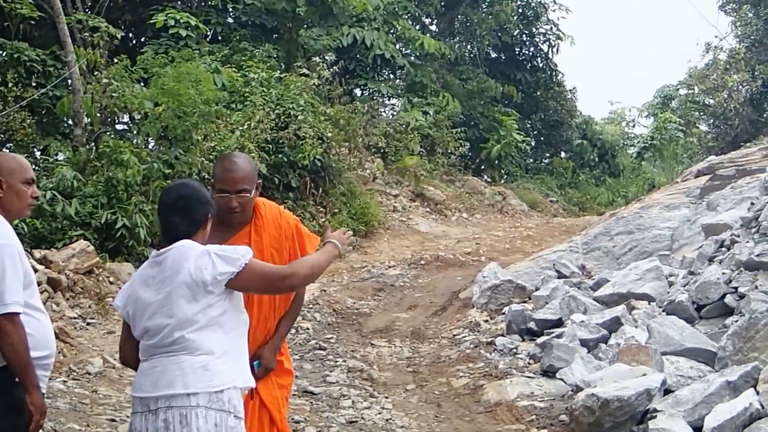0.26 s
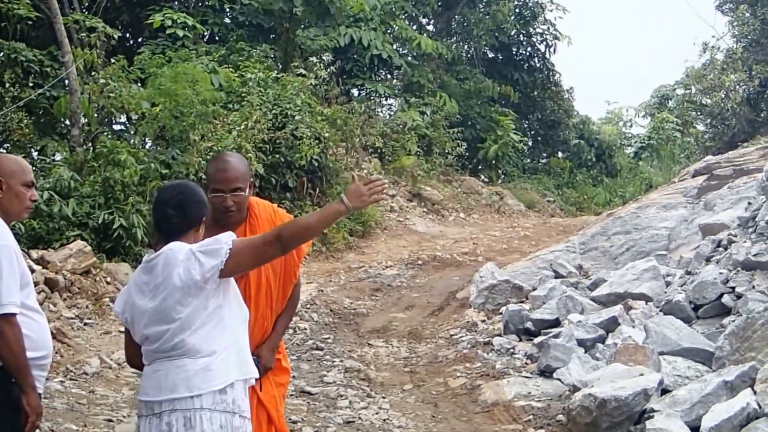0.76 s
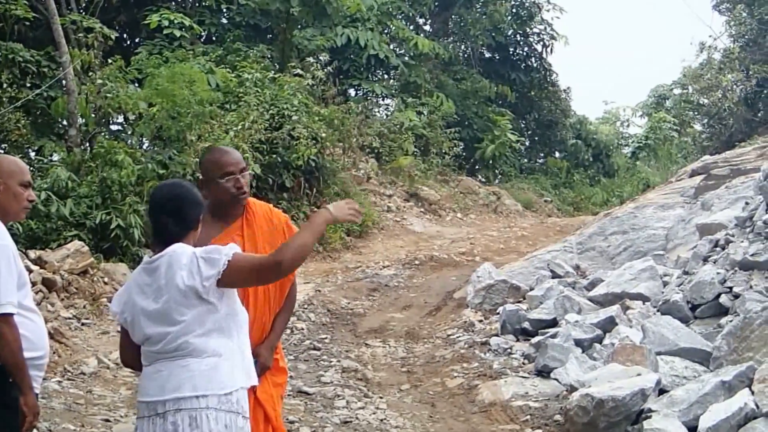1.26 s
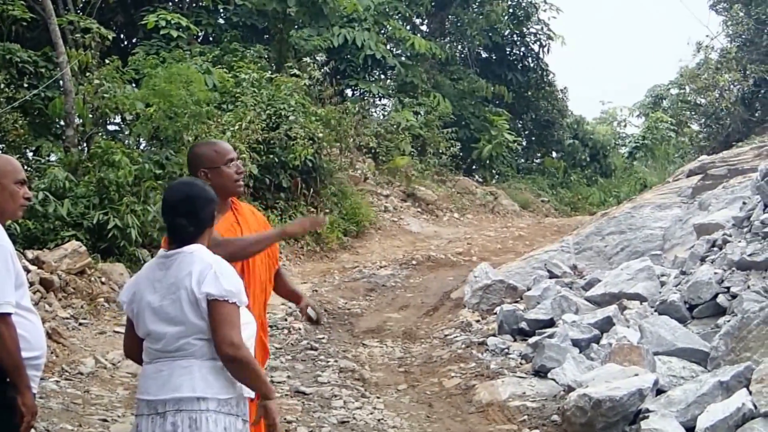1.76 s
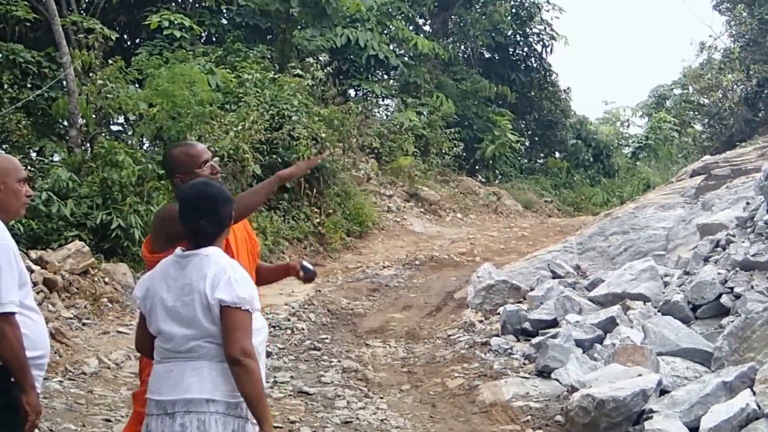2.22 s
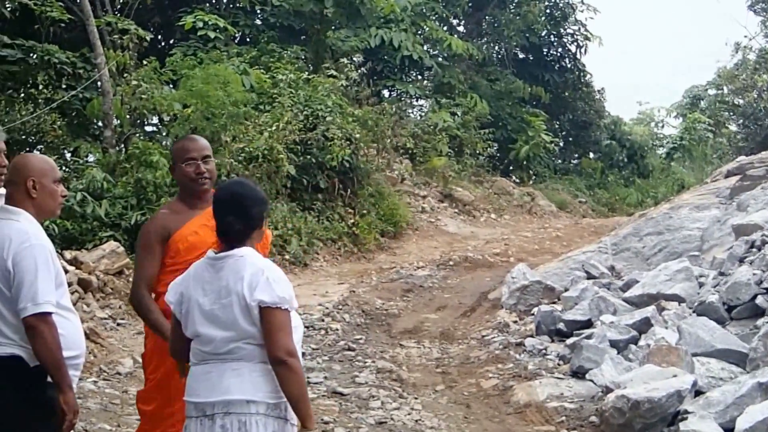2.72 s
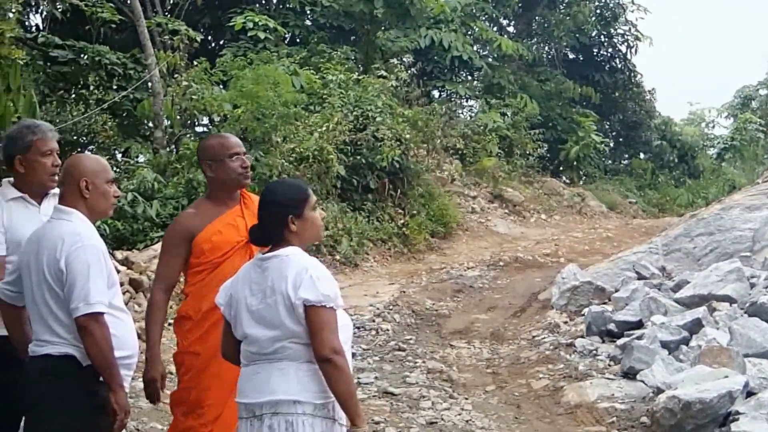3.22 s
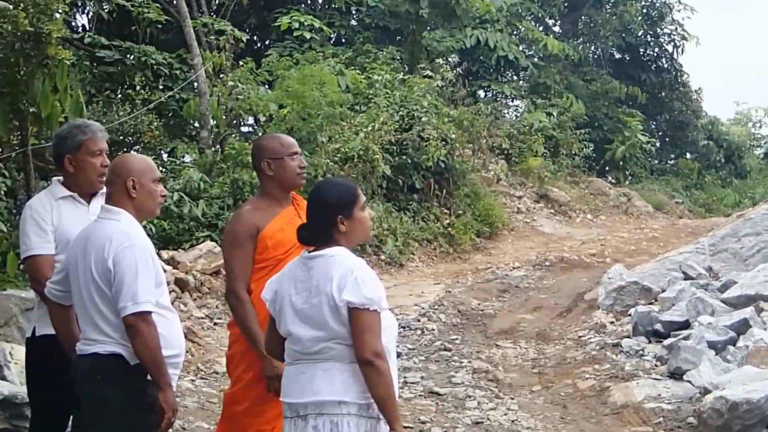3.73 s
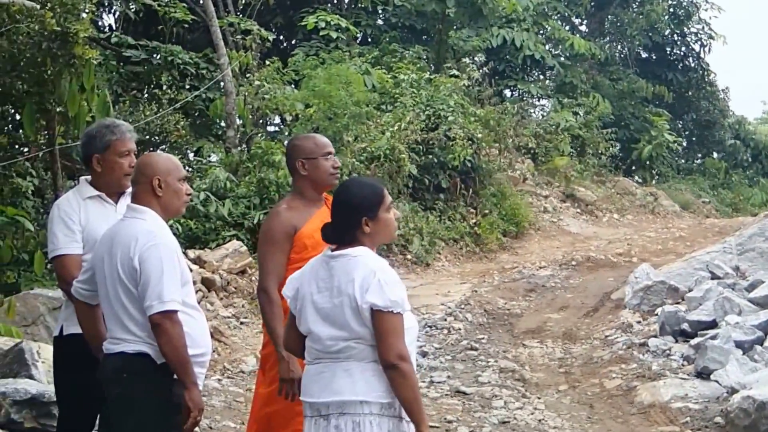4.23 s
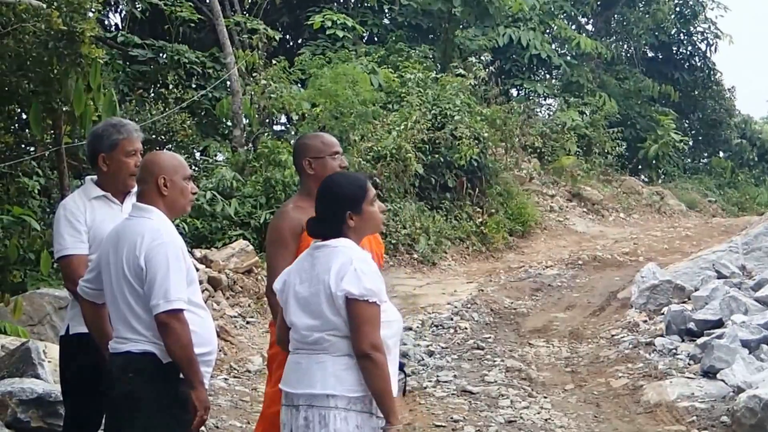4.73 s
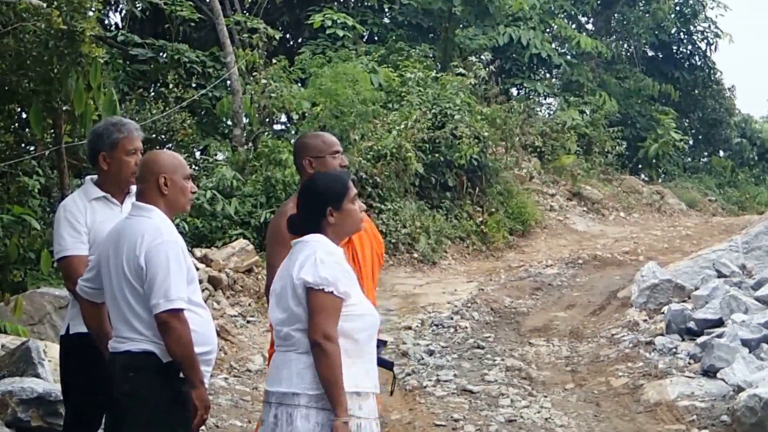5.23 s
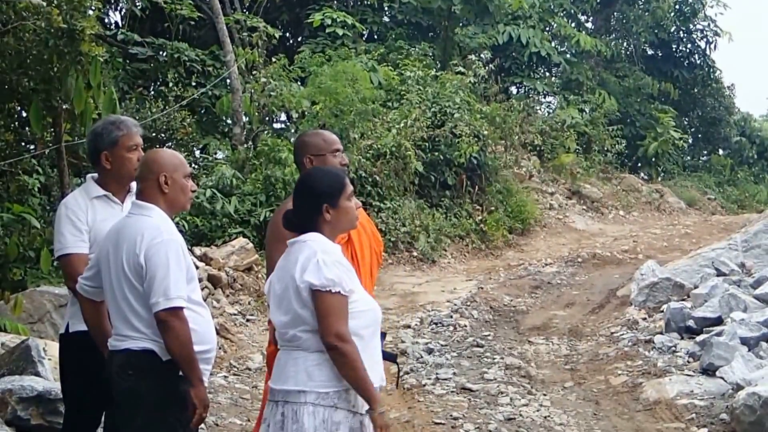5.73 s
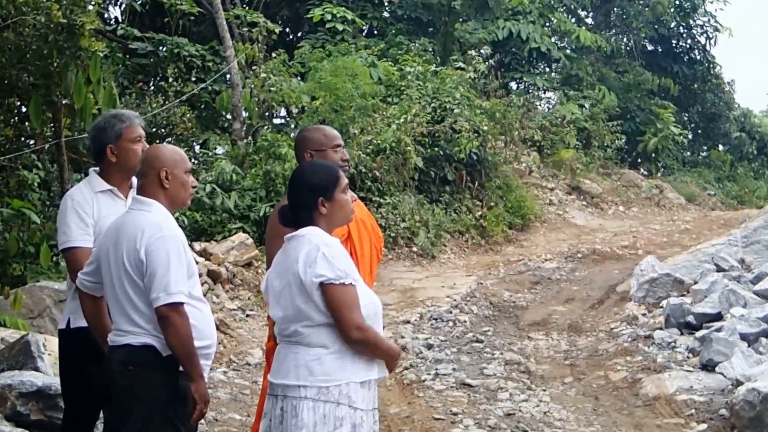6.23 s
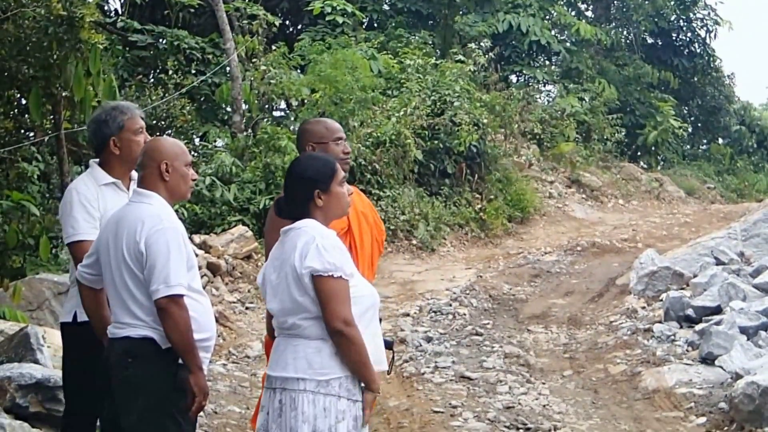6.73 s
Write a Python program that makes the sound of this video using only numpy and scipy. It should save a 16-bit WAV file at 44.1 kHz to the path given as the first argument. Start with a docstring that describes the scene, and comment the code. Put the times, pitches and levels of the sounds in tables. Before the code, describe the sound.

Fast, continuous rock drilling is already under way and never stops. Bright metallic ringing and rattling overlap from blow to blow, with sharp rock cracks, short exhaust puffs and scattered quarry reflections. The drill labours at one and a half and three seconds, then recovers and later takes on a clankier body. Air hisses and faintly whistles, and a compressor drones low beneath. A stereo microphone pair stands at a distance outdoors.

```python
"""A rock drill hammers granite some way off in an open quarry, about ten blows a second, each with a shrill ring.
Each blow is a puff of exhaust pulses and a crack of filtered noise, with a longer rattle scattered by the rock.
Knocks and rattles set the drill steel and the drill body ringing through narrow resonances.
Compressed air hisses and whistles all the while as filtered noise.
The compressor's engine drones underneath, built from wavering sine waves."""
import sys
import numpy as np
from scipy import signal
from scipy.fft import rfft, irfft, next_fast_len
from scipy.io import wavfile
from scipy.ndimage import map_coordinates

SR = 44100
rng = np.random.default_rng(int(sys.argv[2]) if len(sys.argv) > 2 else 0)


def transcribe(u):
    """Save the signal u as a 16-bit wav file named by the first command-line argument.

    u: samples, shape (n,) or (channels, n), limited to [-1, 1]; the rate is SR.
    q: integer samples, one column per channel.
    """
    v = np.clip(np.atleast_2d(u).T, -1, 1)
    q = np.round(v * 32767).astype(np.int16)
    wavfile.write(sys.argv[1], SR, q)


N = 307377  # length in samples, about 7 seconds

# Piston speed, held until the next row; it labours briefly twice.
# Each row: start in seconds, speed in blows per second.
PISTON_SPEED = [(0, 10.378), (1.418, 10.138), (1.517, 9.533), (1.622, 10.012), (1.722, 10.355),
                (2.591, 10.243), (3.177, 9.26), (3.393, 10.214), (4.176, 10.332), (6.208, 10.431)]
FIRST_BLOW_S = 0.0693

# How hard the drill bites; drives crack, exhaust, hiss and whistles. Each row: time in seconds, effort in dB.
EFFORT_CURVE = [(0, 0.5), (.2, 2.2), (.75, -1.5), (1.4, -1.6), (1.68, 2), (2.0, 0.8), (2.4, 0.5),
                (2.8, 0.5), (3.1, 1.7), (3.65, 3.5), (3.98, 1.3), (4.35, 2.8), (4.7, 1), (5.2, 2),
                (5.8, -1.5), (6.45, -0.8), (6.97, 0)]
EXHAUST_FOLLOWS = 0.57  # dB of exhaust per dB of crack level

# Chance from blow to blow, as a spread in dB.
CRACK_SPREAD_DB, BODY_SPREAD_DB, STEEL_SPREAD_DB = 0.5, 1.16, 0.8

# Ways the drill steel rings. Each row: pitch in Hz, width in Hz, relative level in dB,
# share fed by the rebound from 0 to 1.
STEEL_MODES = [(4717, 33, -17, 0.1), (4868, 24, -6, 0.18), (4880, 9.6, -3, 0.27), (4933, 70, -12, 0),
               (5210, 23, -3.5, 0.14), (5410, 34, -13, 0.8), (5370, 33, -10.5, 0.32),
               (5524, 83, -12.5, 0.7), (6140, 34, -17.5, 0.1), (6326, 17.4, -9.5, 0.06),
               (7800, 13, -39, 0.9), (7857, 23, -15.5, 0.73), (9300, 74, -28.5, 0.27),
               (10600, 27, -27.5, 0.35), (10960, 48, -27.5, 0.23), (12470, 33, -38, .1),
               (12860, 74, -39, 0.7), (14160, 41, -42, 0.4)]
# How hard the steel bounces back into the chuck, beside the blow itself.
# Each row: time in seconds, relative strength in dB.
REBOUND_CURVE = [(0, -2), (.6, -0.5), (1.4, -2.5), (1.6, -1.5), (3.15, 6.5), (3.35, -12), (4.4, -7),
                 (5.1, 5), (5.6, 3), (6.97, 0.5)]
# The strength of the steel's blows creeps up very slightly.
STEEL_START_DB, STEEL_RISE_DB_PER_S = 0.1, 0.02
# The steel's highest modes start strong and fade as it sinks into the rock.
SHRILL_FROM_HZ, SHRILL_START_DB, SHRILL_FADE_DB_PER_S = 9000, 5, 1

# Ways the drill body rings. Each row: pitch in Hz, width in Hz, relative level in dB.
BODY_MODES = [(711, 16, -32), (1183, 12, -23.5), (1673, 51, -15), (1824, 20, -19), (2340, 39, -13.5),
              (2753, 21, -10), (2830, 22, -16.5), (3570, 28, -10.5), (3830, 5.3, -17.5)]
# How loud the body's upper resonances are. Each row: time in seconds, relative level in dB.
UPPER_BODY_CURVE = [(0, -8), (.6, -4), (1.3, -6.5), (1.6, -3.5), (3.2, 1.5), (4.3, 1.5), (4.8, -3.5),
                    (5.55, 2.5), (6.15, 4), (6.49, -6), (6.59, 3), (6.97, 1)]
UPPER_BODY_HZ, UPPER_BODY_DB, LOWER_BODY_DB = 2000, -1.5, -0.5

# The steel binds in the hole once: its ring is choked, the body takes the blows and more air escapes.
# The row: start, attack, hold and release, all in seconds.
BINDING = (3.13, .3, 0.47, 0.33)
CHOKE_DB, BOUND_BODY_DB, BOUND_WHISTLE_DB = -6, 2.5, 9.5
# The body's lower resonances ring up for a moment as the piston first labours.
# The row: start, attack, hold and release, all in seconds.
JOLT_SWELL = (1.43, 0.21, 0.32, 0.28)
JOLT_DB = 7.5
# Late on, the drill settles into a clank on a close pair of body resonances.
# The row: start, attack, hold and release, all in seconds.
CLANK_SWELL = (4.76, 0.28, 1.8, .3)
CLANK_DB = 4
# The row: lowest and highest pitch of that pair, in Hz.
CLANK_RANGE = (2600, 3000)

# Tone colour of the crack on the rock. Each row: pitch in Hz, relative gain in dB.
CRACK_COLOUR = [(100, -50), (400, -15), (900, -12.5), (1700, -10), (2800, -12), (3600, -8), (4080, -31.5),
                (4600, -24.5), (5200, -15.5), (6300, -12), (7000, -44), (11200, -25), (13000, -64),
                (14500, -59), (16000, -68)]
# Tone colour of the sound scattered by the quarry. Each row: pitch in Hz, relative gain in dB.
SCATTER_COLOUR = [(40, -41), (75, -35.5), (120, -20), (300, -25), (520, -21.5), (900, -20.5), (3500, -18),
                  (4080, -30), (4550, -39), (5200, -10), (6200, -22.5), (7000, -45), (11200, -33),
                  (13000, -60), (14500, -67)]
# Tone colour of the exhaust puff. Each row: pitch in Hz, gain in dB.
PUFF_COLOUR = [(25, -23), (50, -7), (90, 4), (160, 7.5), (300, -4.5), (520, 9), (900, 6.5), (1700, 7.5),
               (3000, 0.5), (4500, -38), (16000, -65)]
# Tone colour of the air hiss. Each row: pitch in Hz, gain in dB.
AIR_COLOUR = [(25, -55), (60, -50.5), (130, -30.5), (300, -31), (800, -24), (1600, -29), (3300, -21.5),
              (4080, -36), (5300, -14.5), (7000, -40.5), (11300, -41.5), (13000, -49), (14500, -91)]

# The two air whistles. The row: lower and upper pitch in Hz.
WHISTLE_PITCHES = (841, 1123)
# Levels are for an effort of 0 dB; the last number is dB gained per dB of effort.
LOWER_WHISTLE_DB, UPPER_WHISTLE_DB, WHISTLE_FOLLOWS = -44.5, -53.5, 1.93

# Tones of the compressor engine. Each row: multiple of the shaft speed, middle level in dB rms.
ENGINE_TONES = [(2, -70.5), (3, -59.5), (4, -62), (6, -54), (8, -58), (9, -64.5)]
ENGINE_HZ = 29.73  # middle shaft speed, turns per second

# Balance of the microphone pair. Each row: pitch in Hz, left minus right in dB.
MIC_BALANCE = [(200, 4.5), (1100, 5.5), (2300, 8.5), (3500, 13), (4300, 13), (4800, -4.5), (5400, 0.5),
               (6200, 13.5), (7200, -5), (8000, -5), (10000, -16), (12000, -24), (14500, -7)]
# How alike the two microphones sound. Each row: pitch in Hz, likeness from 0 to 1.
MIC_LIKENESS = [(2000, 1), (3000, 0.98), (4200, 0.16), (5300, 0.96), (8000, 1), (12000, 0.34)]
CUTOFF_HZ = 15750


def blow_times():
    """One blow per piston cycle; the drill is already running, so one falls just before the start."""
    t = np.arange(-SR, N) / SR
    start, rate = np.transpose(PISTON_SPEED)
    cycles = np.cumsum(rate[np.searchsorted(start[1:], t)]) / SR
    cycles -= np.interp(FIRST_BLOW_S, t, cycles)
    whole_cycles = np.arange(-1, np.floor(cycles[-1]) + 1)
    return np.interp(whole_cycles, cycles, t)


def steel(times, steel_db):
    """The drill steel rings at each blow, and again when it bounces back into the chuck."""
    strike = contacts(times, steel_db, rise=0.0004, t60=0.16, alike=0.8, clean=0.11)
    bounce_db = steel_db + curve(REBOUND_CURVE, times)
    bounce = contacts(times + 0.022, bounce_db, rise=0.003, t60=0.19, alike=0.76, clean=0.06)
    shrill_db = SHRILL_START_DB - SHRILL_FADE_DB_PER_S * np.arange(N) / SR
    out = 0
    for k, (hz, width, db, share) in enumerate(STEEL_MODES):
        share = np.clip(share, 0, 1)
        drive = np.sqrt(1 - share) * strike + np.sqrt(share) * bounce
        if hz > SHRILL_FROM_HZ:
            db = db + shrill_db
        # every other mode is flipped in sign
        out = out + (-1) ** k * ringing(drive, hz, width, db, wander_db=0.8)
    return out


def rock(times, crack_db, steel_db):
    """The bit cracks on the granite and the quarry scatters the blow back as a longer rattle."""
    crack = bursts(times + 0.0002, crack_db, rise=0.00076, t60=0.05, alike=0.86)
    scatter_db = (crack_db + steel_db) / 2
    scatter = bursts(times + 0.003, scatter_db, rise=0.0072, t60=0.24, alike=0.8)
    return from_db(1.27) * colour(crack, CRACK_COLOUR) + from_db(2.5) * colour(scatter, SCATTER_COLOUR)


def body(times, body_db):
    """The drill's body clangs at every blow; its lower and upper resonances swell at different moments."""
    t = np.arange(N) / SR
    clang = contacts(times, body_db, rise=0.0004, t60=0.13, alike=0.77, clean=0.24)
    upper_db = curve(UPPER_BODY_CURVE, t) + BOUND_BODY_DB * swell(BINDING, t) + UPPER_BODY_DB
    lower_db = LOWER_BODY_DB + JOLT_DB * swell(JOLT_SWELL, t)
    out = 0
    for hz, width, db in BODY_MODES:
        db = db + (upper_db if hz > UPPER_BODY_HZ else lower_db)
        if CLANK_RANGE[0] < hz < CLANK_RANGE[1]:
            db = db + CLANK_DB * swell(CLANK_SWELL, t)
        out = out + ringing(clang, hz, width, db, wander_db=1.5)
    return out


def exhaust(times, levels_db):
    """Each stroke lets out one pressure pulse, followed by its near echoes."""
    out = np.zeros(N)
    # direct path and reflections off nearby rock: delay in seconds, height
    pulses = [(0.0001, 0.6), (0.0013, -0.65), (0.0034, 0.54), (0.0056, 0.42), (0.0165, 0.31), (0.032, 0.15)]
    for s, db in zip(times, levels_db):
        for delay, height in pulses:
            pulse = np.array([height * from_db(db + rng.normal(0, 1))])
            add(out, pulse, s + delay + rng.normal(0, 0.00006))
    return colour(out, PUFF_COLOUR)


def air():
    """Flushing air hisses and whistles at two pitches on its way out, louder when the drill bites hard."""
    t = np.arange(N) / SR
    effort_db = curve(EFFORT_CURVE, t)
    hiss_db = 0.5 * effort_db + 1.4 * drift(14)
    hiss = colour(rng.standard_normal((2, N)), AIR_COLOUR) * from_db(hiss_db)
    lower_db = LOWER_WHISTLE_DB + WHISTLE_FOLLOWS * effort_db
    upper_db = UPPER_WHISTLE_DB + WHISTLE_FOLLOWS * effort_db + BOUND_WHISTLE_DB * swell(BINDING, t)
    lower = whistle(WHISTLE_PITCHES[0], width_hz=32.4, level_db=lower_db)
    upper = whistle(WHISTLE_PITCHES[1], width_hz=98, level_db=upper_db)
    return hiss + lower + upper


def whistle(hz, width_hz, level_db):
    """Turbulence in a narrow resonance; the jet saturates, so pitch wavers more than strength."""
    tone = resonate(resonate(rng.standard_normal(N), hz, width_hz), hz, width_hz)
    strength = np.abs(signal.hilbert(tone, next_fast_len(N)))[:N]
    evened = tone / (strength + 0.57 * strength.mean())
    return from_db(level_db) * rms_one(evened)


def engine():
    """The engine drones at whole multiples of its shaft speed; speed and each tone's level waver a little."""
    turns = np.cumsum(ENGINE_HZ * (1 + 0.00278 * drift(3))) / SR
    out = 0
    for multiple, db in ENGINE_TONES:
        height = np.sqrt(2) * from_db(db + 0.97 * drift(5))
        out = out + height * np.sin(2 * np.pi * (round(multiple) * turns + rng.random()))
    return out


def contacts(times, levels_db, rise, t60, alike, clean):
    """Steel on steel: a clean knock per blow (share `clean` of the power) and a dying rattle, each of rms 1."""
    clean, knocks = np.clip(clean, 0, 1), np.zeros(N)
    for s, db in zip(times, levels_db):
        add(knocks, from_db([db]), s + rise)
    rattle = bursts(times, levels_db, rise, t60, alike)
    return np.sqrt(clean) * rms_one(knocks) + np.sqrt(1 - clean) * rms_one(rattle)


def bursts(times, levels_db, rise, t60, alike):
    """A dying rattle per blow; each takes nearly the same paths as the last, so its grain changes slowly."""
    t = np.arange(SR // 4) / SR
    envelope = (1 - np.exp(-t / rise)) * from_db(-60 * t / t60)
    alike = np.clip(alike, 0, 0.98)
    out, grain = np.zeros((2, N)), rng.standard_normal((2, len(t)))
    for s, db in zip(times, levels_db):
        grain = alike * grain + np.sqrt(1 - alike ** 2) * rng.standard_normal(grain.shape)
        add(out, from_db(db) * envelope * grain, s)
    return out


def ringing(drive, hz, width_hz, level_db, wander_db):
    """One mode fed by the blows; as the bit turns, it takes a changing share."""
    return resonate(drive, hz, width_hz) * from_db(level_db + wander_db * drift(2.456))


def resonate(x, hz, width_hz):
    """One resonance: the filter lets its own pitch through at about full strength and little else."""
    r = np.exp(-np.pi * width_hz / SR)
    feed = (1 - r * r) / 2 * np.array([1, 0, -1])
    return signal.lfilter(feed, [1, -2 * r * np.cos(2 * np.pi * hz / SR), r * r], x)


def colour(x, spectrum):
    """Shape the tone with a filter that never sounds before its input (minimum phase)."""
    size = 2 * next_fast_len(N // 2 + SR // 10)
    gain = from_db(at_hz(spectrum, np.fft.rfftfreq(size, 1 / SR)))
    cepstrum = irfft(np.log(gain))
    # folding the second half onto the first puts the response after the input
    cepstrum[1:size // 2] *= 2
    cepstrum[size // 2 + 1:] = 0
    return irfft(rfft(x, size) * np.exp(rfft(cepstrum)))[..., :N]


def drift(rate):
    """Smooth chance of spread about 1 that turns about `rate` times a second."""
    knots, coarse = rng.standard_normal(400), np.linspace(0, N, 4000)
    smooth = map_coordinates(knots, [coarse / SR * rate], order=2, mode="mirror")
    return np.interp(np.arange(N), coarse, smooth)


def swell(shape, t):
    """Attack, hold and release, 0-1."""
    return np.interp(t, np.cumsum(np.maximum(shape, 0)), [0, 1, 1, 0])


def curve(points, t):
    """Read a control curve at times t."""
    return np.interp(t, *np.transpose(points))


def at_hz(points, hz):
    """Read a table on a log-frequency axis."""
    f, value = np.transpose(points)
    return np.interp(np.log(np.maximum(hz, 1)), np.log(f), value)


def add(out, sound, s):
    """Mix a short sound in at time s."""
    at = int(round(s * SR))
    first, last = max(at, 0), min(at + sound.shape[-1], N)
    if last > first:
        out[..., first:last] += sound[..., first - at:last - at]


def from_db(db):
    """Turn dB into a plain multiplier."""
    return 10 ** (np.asarray(db) / 20)


def rms_one(x):
    """Scale a sound to an rms of 1."""
    return x / np.sqrt(np.mean(x ** 2) + 1e-20)


def scene():
    """Crack and exhaust follow the effort; every blow on rock, body and steel has a little chance of its own."""
    times = blow_times()
    crack_luck, body_luck, steel_luck = rng.standard_normal((len(times), 3)).T
    crack_db = curve(EFFORT_CURVE, times) + CRACK_SPREAD_DB * crack_luck
    body_db = BODY_SPREAD_DB * body_luck
    steel_db = STEEL_START_DB + STEEL_RISE_DB_PER_S * times + STEEL_SPREAD_DB * steel_luck
    steel_db = steel_db + CHOKE_DB * swell(BINDING, times)
    drill = steel(times, steel_db) + rock(times, crack_db, steel_db) + body(times, body_db)
    return drill + exhaust(times, EXHAUST_FOLLOWS * crack_db) + air() + engine()


def record(dry):
    """Two microphones differ in tone and partly in grain; the left is two samples late and the top is cut."""
    size = 2 * next_fast_len(N // 2 + SR // 10)
    hz = np.fft.rfftfreq(size, 1 / SR)
    shared, own = rfft(dry, size)
    alike = np.clip(at_hz(MIC_LIKENESS, hz), 0, 1)
    ratio = from_db(at_hz(MIC_BALANCE, hz))
    left = shared * ratio * np.exp(-2j * np.pi * hz * 2 / SR)
    right = alike * shared + np.sqrt(1 - alike ** 2) * own
    # keep the pair's total power the same whatever the balance
    pair = irfft(np.array([left, right]) * np.sqrt(2 / (1 + ratio ** 2)))[:, :N]
    top_cut = signal.ellip(10, 0.1, 80, CUTOFF_HZ, fs=SR, output="sos")
    return signal.sosfilt(top_cut, pair)


dry = scene()
out = record(dry)
transcribe(out)
```